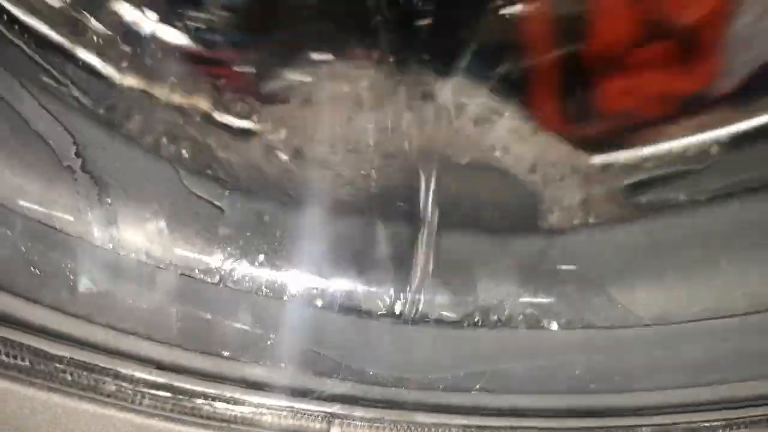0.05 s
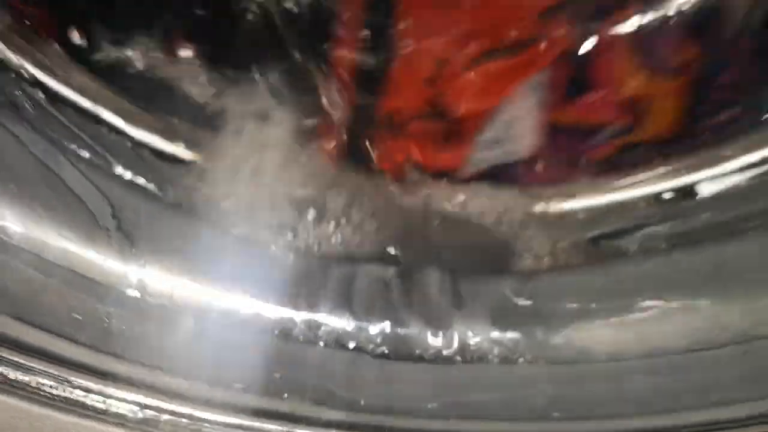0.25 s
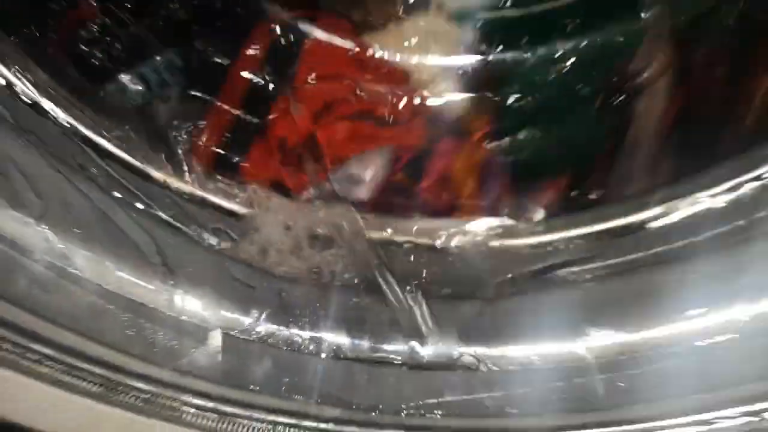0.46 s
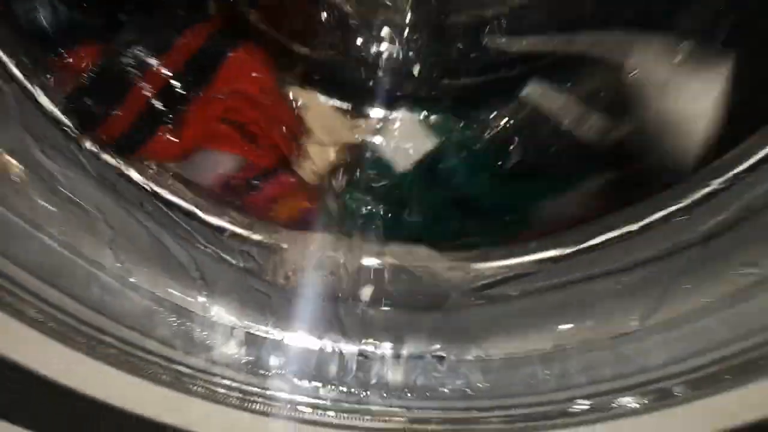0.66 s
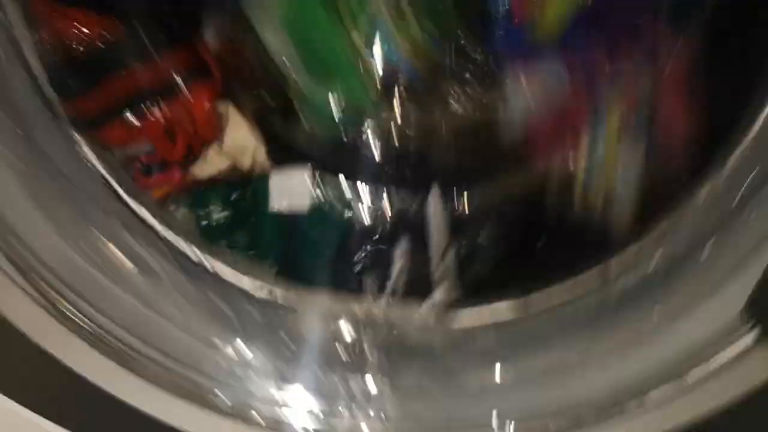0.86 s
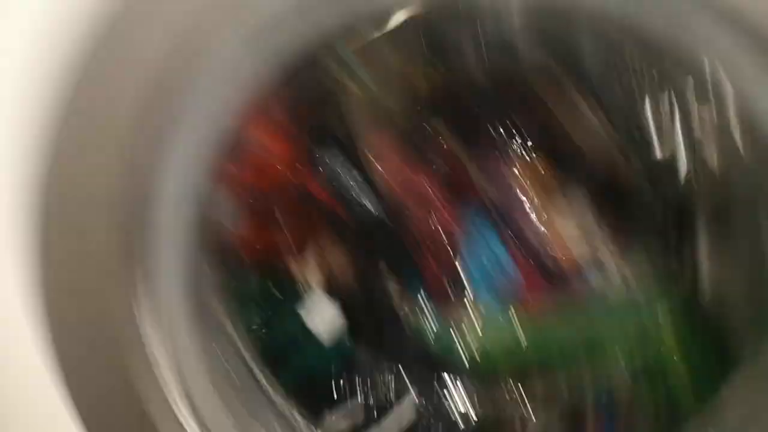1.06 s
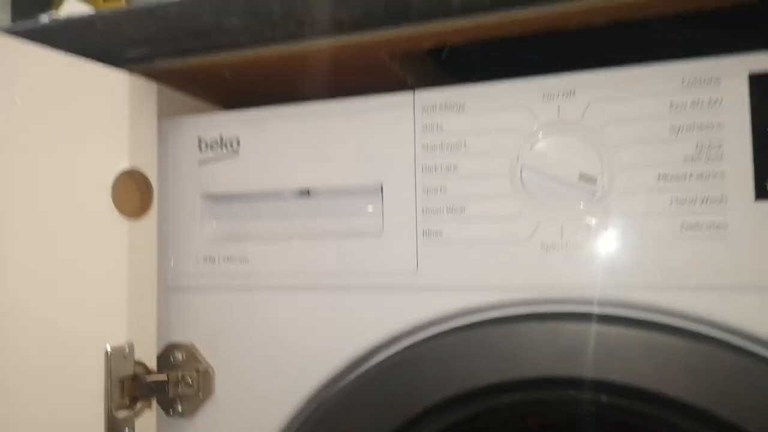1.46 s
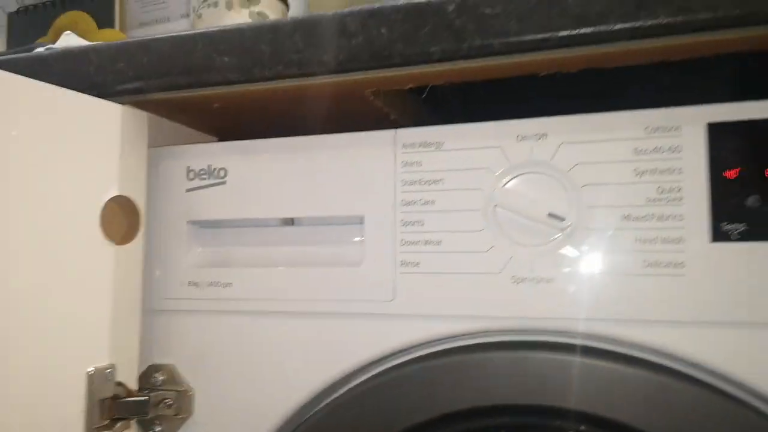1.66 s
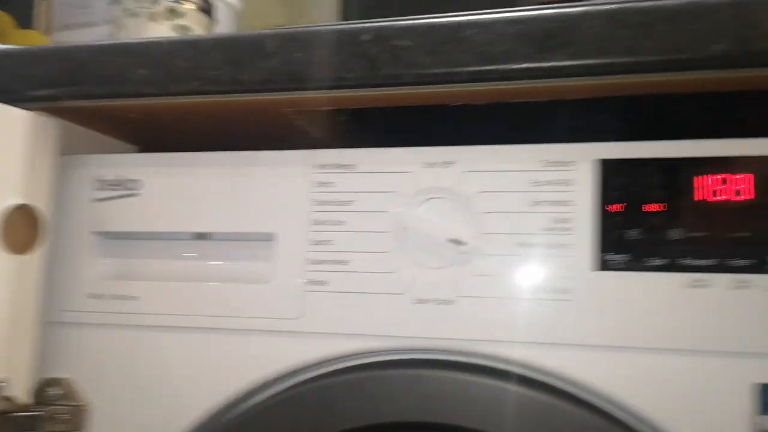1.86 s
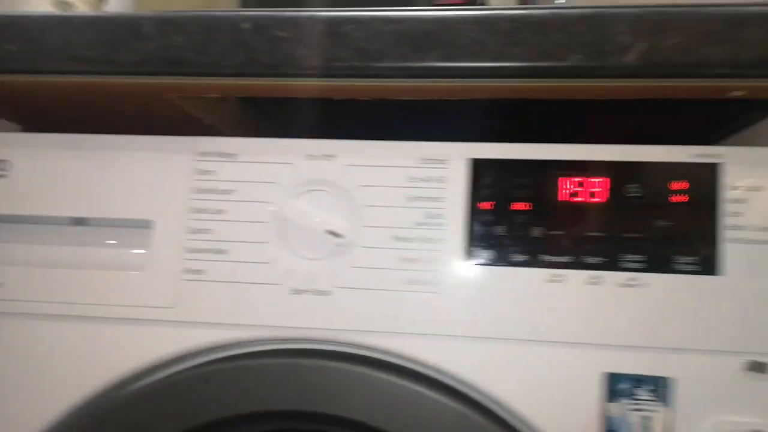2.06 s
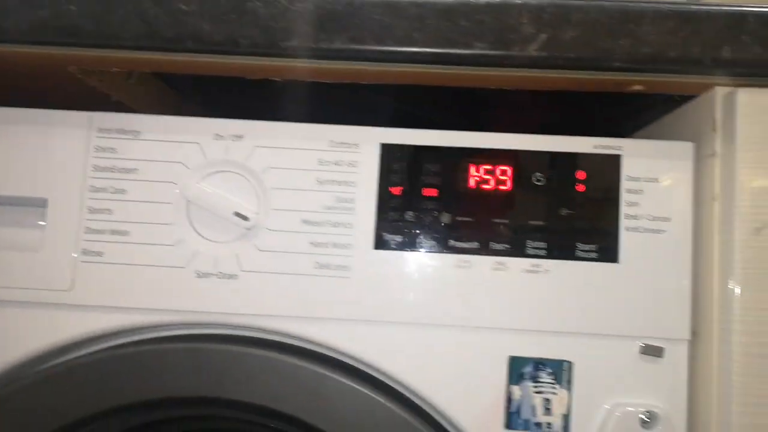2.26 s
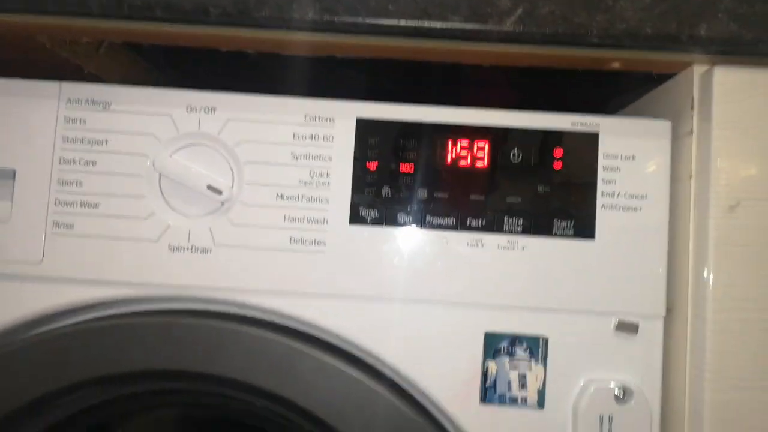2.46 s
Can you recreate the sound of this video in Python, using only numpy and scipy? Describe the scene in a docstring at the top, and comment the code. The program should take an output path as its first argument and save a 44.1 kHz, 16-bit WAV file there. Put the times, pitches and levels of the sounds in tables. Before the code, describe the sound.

Wet laundry sloshing in a faintly humming washing machine, with a brief rubbing rush early on.

```python
"""In a small kitchen, a front-loading washing machine hums and turns wet laundry.
It is heard from a hand-held phone. A short rush, like a sleeve sliding over the phone, shudders
as the cloth sticks and slips. Then water sloshes and drips more and more faintly, with a brief echo,
while the moving phone picks up soft bumps and rumble."""
import sys
import numpy as np
from scipy import signal
from scipy.fft import rfft, irfft
from scipy.io import wavfile

SR = 44100
rng = np.random.default_rng(int(sys.argv[2]) if len(sys.argv) > 2 else 0)


def materialize(psi):
    """Save the field psi as 16-bit PCM at rate SR to the path in sys.argv[1].

    A 1-D psi becomes a single channel; in a 2-D psi each row is a channel.
    """
    bounded = np.clip(np.atleast_2d(psi).T, -1, 1)
    quanta = np.round(bounded * 32767).astype(np.int16)
    wavfile.write(sys.argv[1], SR, quanta)


N = 110250
T = np.arange(N) / SR
F = np.fft.rfftfreq(N, 1 / SR) + 1e-3

# how the rush swells and fades: t/s, relative body level/dB, relative treble level/dB
RUSH_LEVELS = [(.204, -77, -77.5), (.214, -68, -63), (.262, -50.5, -61), (.302, -43, -48), (.41, -38, -46),
               (.585, -38.5, -42), (.612, -34, -38), (.63, -39, -43), (.78, -37, -44), (.803, -45.5, -35),
               (.82, -43.5, -36), (.845, -49, -50), (.9, -55, -74), (.96, -91, -84)]
# low purr of the fast slide: t/s, level/dB
PURR_LEVELS = [(.2, -63), (.24, -48.5), (.39, -40.5), (.43, -36), (.62, -36), (.72, -39), (.81, -38),
               (.87, -57), (.98, -91)]
# tone of the rush's body: f/Hz, level/dB
RUSH_BODY_TONE = [(200, -43), (420, 2), (530, -4.5), (600, -3), (670, -7), (760, -1.5), (900, -6),
                  (1300, -4), (1600, -3.5), (2000, -4), (2650, -4.5), (2950, -4.5), (3250, -15),
                  (5000, -35), (9000, -47)]
# tone of the rush's treble: f/Hz, level/dB
RUSH_TREBLE_TONE = [(1500, -34), (3300, -1.5), (4500, 1), (5800, 1), (7000, 1.5), (9000, -0.5),
                    (10000, -6.5), (11000, -13), (13000, -17), (15500, -23)]
# tone of the purr: f/Hz, level/dB
PURR_TONE = [(30, 3), (70, -6), (100, 0), (140, -0.5), (190, 0), (280, -3.5), (305, -3), (332, 3),
             (360, -4), (420, -6.5), (500, -13.5), (900, -40)]
# spells of sticking and slipping: start/s, length/s, slip rate/Hz, strength/dB
SHUDDERS = [(0.213, 0.099, 71.6, -33.5), (0.293, 0.089, 61, -31.5), (0.388, .3, 110, -44),
            (0.817, 0.088, 88, -32.5), (0.899, 0.059, 105, -41.5), (0.998, 0.045, 55, -38),
            (1.04, 0.21, 49.3, -36.5)]
# water in the drum: t/s, water level/dB, spray level/dB
SLOSH_LEVELS = [(0, -88, -90), (.25, -62.5, -84), (.7, -38, -63), (.87, -55, -55.5), (1.0, -48, -68.5),
                (1.12, -52, -61), (1.27, -53, -62), (1.32, -49, -78), (1.36, -55, -60.5),
                (1.49, -57.5, -64.5), (1.55, -43, -64), (1.65, -51.5, -72), (1.72, -51, -77),
                (1.8, -61, -70), (1.9, -62.5, -76), (2.05, -62.5, -75), (2.24, -63, -67.5),
                (2.5, -66, -80.5)]
# tone of the water: f/Hz, level/dB
WATER_TONE = [(150, -13), (310, -1.5), (510, -6), (700, -8.5), (1020, -7.5), (1300, -11.5), (1560, -5.5),
              (2200, -9.5), (2650, -9), (3150, -15.5), (3700, -16), (4400, -20), (5200, -21.5),
              (6000, -22.5), (7100, -21), (9000, -25.5), (11000, -42), (15500, -42)]
# tone of the spray: f/Hz, level/dB
SPRAY_TONE = [(1500, -42), (3500, -4.5), (4400, -6.5), (5200, 1.5), (6200, -7), (7100, -6.5), (9000, -5),
              (10500, -19), (12000, -74), (15500, -39)]
# scuffs, splashes and a dull knock: t/s, level/dB, f/Hz, width/Hz, swell time/s, left minus right/dB
SCUFFS = [(.222, -45, 2350, 930, .012, -6), (0.226, -52, 1190, 220, 0.015, -4),
          (0.252, -51, 2520, 800, 0.023, -5.5), (0.8, -44, 680, 110, 0.029, 11.5),
          (0.814, -32.5, 2650, 310, 0.02, -6), (.83, -43, 168, 80, 0.051, -1),
          (0.941, -45.5, 2010, 500, 0.0097, -15), (0.94, -55, 6500, 2000, 0.013, -9),
          (1.156, -41, 513, 328, 0.0097, -8.5), (1.159, -45.5, 924, 120, 0.0091, -5),
          (1.41, -48.5, 2800, 1020, 0.0082, -9.5), (1.421, -47, 2010, 400, 0.0064, -14.5),
          (1.793, -61.5, 5150, 3000, 0.0054, -9), (1.894, -65.5, 4700, 3000, 0.0094, -11),
          (1.977, -50.5, 296, 70, .016, 0.5)]
# drips and ticks: t/s, strength/dB, main f/Hz, second f/Hz, second against main/dB,
# time to fade by 60 dB/s, left minus right/dB
TICKS = [(.073, -49, 8860, 1070, -8, .03, 1), (0.129, -68, 4100, 1040, 9.5, 0.084, -4),
         (0.129, -62, 8600, 2250, 1.5, 0.088, -5), (0.772, -32, 4030, 2550, -6, 0.028, -8),
         (0.982, -40, 2620, 1500, -26, 0.014, -7), (1.505, -49.5, 5130, 3800, -5, 0.072, 0),
         (1.543, -46, 5100, 6800, -7, 0.032, -12), (1.56, -59, 6900, 5150, 6, 0.037, -14),
         (1.626, -40, 1560, 2600, -1, .035, -9.5), (1.673, -52, 3610, 1490, 8, 0.027, -12),
         (2.117, -47.5, 3530, 1940, -1, .055, -8.5), (2.247, -52, 4360, 1870, 5.5, 0.042, -2.5),
         (2.288, -50, 6930, 2620, -1.5, 0.037, -14.5)]
# rumble of the moving phone: t/s, sway level/dB, rustle level/dB
RUMBLE_LEVELS = [(0, -42, -80), (.14, -51, -80), (.19, -60, -87), (.25, -34, -65), (.6, -64, -58),
                 (.86, -35, -48.5), (1.0, -32.5, -51), (1.17, -30, -48.5), (1.28, -32, -59.5),
                 (1.43, -30, -47.5), (1.5, -36, -53), (1.66, -42, -51), (1.74, -35.5, -50),
                 (1.79, -38, -56.5), (1.87, -43, -58), (1.93, -43, -65.5), (2.07, -42, -60.5),
                 (2.13, -39.5, -56.5), (2.21, -34, -69), (2.28, -44.5, -72), (2.5, -44.5, -65.5)]
# tones of the sway and the rustle: f/Hz, level/dB
SWAY_TONE = [(6, -3), (14, 5), (26, -0.5), (42, -18), (65, -19), (100, -29), (200, -49), (600, -65)]
RUSTLE_TONE = [(30, -32), (70, 0.5), (130, 3), (220, 2.5), (330, -2.5), (480, -19), (900, -7),
               (3000, -71)]
# soft bumps on the phone: t/s, strength/dB, contact time/s
BUMPS = [(1.148, -13.5, 0.0064), (1.168, -12.5, 0.0043), (1.1763, -30.5, 0.00072), (1.403, -22, 0.002),
         (1.444, -21.5, 0.0032), (1.727, -23, 0.0017), (1.748, -18, 0.0091), (1.786, -32.5, .002),
         (1.813, -31.5, 0.0016), (1.817, -32.5, 0.0017), (1.857, -24, 0.0023), (1.874, -25, 0.003)]
# notes in the motor's hum: f/Hz, level/dB
HUM_NOTES = [(100, -70.5), (144, -68), (184, -76.5), (255, -78), (338, -80.5)]
# tone of the quiet kitchen: f/Hz, level/dB
KITCHEN_TONE = [(25, 12.5), (70, -18), (150, -19), (220, -21), (330, -15), (460, -17), (560, -38),
                (850, -36), (1080, -24), (1400, -46), (2500, -39), (3500, -45), (8000, -46), (11000, -43),
                (15500, -53)]
# pitches that stand out in nearby sounds: f/Hz, width/Hz, boost/dB
RESONANCES = [(1078, 116, 5.5), (1480, 160, 2), (1926, 32, 8.5), (2040, 25, 8), (2420, 270, 4.5),
              (2710, 240, 4), (6790, 140, 6.5), (7520, 110, 5.5)]
# lean to one side: f/Hz, left minus right/dB
BALANCE = [(450, 0), (850, 1), (1300, -6.5), (1800, -8), (2500, -13.5), (3300, -2), (5000, -5), (6700, -5),
           (8500, -1), (12000, -1.5)]
# stereo width between the phone's two microphones: f/Hz, side minus middle/dB
STEREO_WIDTH = [(30, -22), (85, -22), (170, -10), (350, -11.5), (480, 9.5), (650, -1), (1050, -2),
                (1400, -0.5), (1800, 5), (2400, 2), (4000, 0)]


def rush():
    """Sliding fibres make countless tiny slips: a ringing body, a gritty treble and a low purr."""
    slips = grains(per_s=2700, spread_db=0.59, ring_s=0.0053)
    flicker = undb(0.46 * wander(hz=37))
    body = shape(slips, RUSH_BODY_TONE) * fade(RUSH_LEVELS, column=1) * flicker
    treble = shape(slips, RUSH_TREBLE_TONE) * fade(RUSH_LEVELS, column=2)
    purr = shape(grains(per_s=2000, spread_db=0.55, ring_s=0.0045), PURR_TONE) * fade(PURR_LEVELS)
    return undb(1.0) * (body + treble) + purr


def shudders(jitter=.08, slip_s=0.0021, dull_hz=180):
    """The rubbing cloth sticks and slips, giving uneven low pulses."""
    out = np.zeros(N)
    for start, length, rate, db in SHUDDERS:
        gaps, sizes = rng.standard_normal((2, 40))
        times = start + (np.cumsum(1 + jitter * gaps) - .5) / rate
        pulses = np.zeros(N)
        for at, size in zip(times, sizes):
            if at < start + length:
                pulses += undb(1.8 * size) * push(at, slip_s)
        low_cut = signal.butter(2, 0.6 * rate, "high", fs=SR, output="sos")
        pulses = signal.sosfilt(low_cut, pulses)
        out += unit(pulses) * np.sqrt(length * SR / N) * undb(db)
    return irfft(rfft(out) / (1 + (F / dull_hz) ** 4), N)


def slosh():
    """Wet laundry turns behind the glass: splashes, bubbles and fine spray."""
    water = grains(per_s=900, spread_db=0.83, ring_s=0.0076) + undb(-6.5) * bubbles()
    spray = shape(grains(per_s=550, spread_db=4.9, ring_s=0.0076), SPRAY_TONE)
    flicker = undb(1.4 * wander(hz=25))
    water = shape(water, WATER_TONE) * fade(SLOSH_LEVELS, column=1) * flicker
    return water + spray * fade(SLOSH_LEVELS, column=2)


def bubbles(count=800):
    """Small bubbles ring briefly and rise in pitch."""
    out, t = np.zeros((2, N + 2048)), T[:2048]
    for when, pitch, size, side in rng.random((count, 4)):
        hz, start = 1300 * 6 ** pitch, int(when * N)
        age = t * hz / 14  # reaches 1 after 14 cycles
        rise = 1 + 0.0358 * np.minimum(age, 4)
        ring = np.exp(-age) * np.sin(2 * np.pi * hz * t * rise)
        out[:, start:start + len(t)] += pan(16 * (side - .5)) * undb(8.9 * size) * ring
    return unit(out[:, :N])


def scuffs():
    """Scuffs, splashes and a knock are brief swells of crackle, each around its own pitch."""
    crackle = irfft(stereo(grains(per_s=2500, spread_db=1.2, ring_s=0.00081)), N)
    out = 0
    for at, db, hz, width, swell_s, side in SCUFFS:
        swell = np.exp(-((T - at) / swell_s) ** 2)
        out += band(crackle, hz, width) * undb(db) * pan(side) * swell
    return out


def ticks(relative_width=.115, attack_s=0.0009):
    """Drops and small hard things tap the machine: a crack and two short rings."""
    out, hiss = 0, noise()
    crack = undb(-11.5) * band(hiss, hz=4000, width=4000)
    for at, db, hz, second_hz, second_db, fade_s, side in TICKS:
        age = np.maximum(T - at, 0)
        ring = band(hiss, hz, relative_width * hz)
        ring += undb(second_db) * band(hiss, second_hz, 2 * relative_width * second_hz)
        loudness = (1 - np.exp(-age / attack_s)) * undb(-60 * age / fade_s)
        out += undb(db) * pan(side) * (ring + crack) * loudness
    return out


def handling(rebound=0.53, lag_s=0.0091):
    """The phone sways, rustles in the hand and takes soft bumps, each between two dips of pressure."""
    sway = shape(noise(), SWAY_TONE) * fade(RUMBLE_LEVELS, column=1)
    rustle = shape(noise(), RUSTLE_TONE) * fade(RUMBLE_LEVELS, column=2)
    bumps = 0
    for at, db, contact_s in BUMPS:
        dips = 0.67 * push(at - lag_s, 2 * contact_s) + 0.25 * push(at + lag_s, 2 * contact_s)
        bumps += undb(db) * (push(at, contact_s) - rebound * dips)
    return sway + rustle + bumps


def motor():
    """The drum motor hums, wavering a little in pitch and loudness."""
    uneven_time = np.cumsum(1 + 0.0095 * wander(hz=7)) / SR
    hum = 0
    for hz, db in HUM_NOTES:
        height = np.sqrt(2) * undb(db + 2.8 * wander(hz=5.3))
        hum += height * np.sin(2 * np.pi * hz * uneven_time)
    return hum


def kitchen_echo(sound, delay_s=.006, fade_s=0.42, dull_hz=3940):
    """The kitchen throws back a short, duller echo."""
    tail = unit(noise() * (T > delay_s) * undb(-60 * T / fade_s)) / np.sqrt(N)
    tail = irfft(rfft(tail) / (1 + 1j * F / dull_hz), N)
    return signal.fftconvolve(sound, tail, axes=1)[:, :N]


def kitchen_quiet():
    """A faint, steady, low noise fills the room."""
    return undb(-60.5) * shape(noise(), KITCHEN_TONE)


def undb(db):
    """Turn decibels into a multiplier."""
    return 10 ** (np.asarray(db) / 20)


def unit(x):
    """Scale a signal to an average power of 1."""
    return x / np.sqrt(np.mean(x ** 2) + 1e-20)


def fade(rows, column=1):
    """A multiplier over time, from one dB column of a table."""
    rows = np.array(rows)
    return undb(np.interp(T, rows[:, 0], rows[:, column]))


def spectrum(rows):
    """Join a table's points to get dB at every frequency."""
    rows = np.array(rows)
    return np.interp(np.log(F), np.log(rows[:, 0]), rows[:, 1])


def pan(db):
    """Left and right multipliers; positive dB leans left."""
    return undb(np.array([[.5], [-.5]]) * db)


def noise():
    """Two unrelated white noises."""
    return rng.standard_normal((2, N))


def wander(hz):
    """A smooth random drift of about 1 either way, mostly slower than hz."""
    return unit(irfft(rfft(rng.standard_normal(N)) / (1 + (F / hz) ** 4), N))


def grains(per_s, spread_db, ring_s):
    """Tiny contacts of uneven size at random moments, each a very short burst of noise."""
    hits = rng.random(N) < per_s / SR
    sizes = undb(spread_db * np.minimum(rng.exponential(size=N), 4))
    power = signal.lfilter([1], [1, -np.exp(-2 / (ring_s * SR))], hits * sizes ** 2)
    return unit(np.sqrt(power) * noise())


def push(at, contact_s):
    """One pulse of pressure with a rounded tip."""
    return np.exp(-np.sqrt(((T - at) / contact_s) ** 2 + 0.034))


def band(x, hz, width):
    """Keep the sound near one pitch by passing it twice through a resonance."""
    return unit(irfft(rfft(x) / (1 + 1j * (F / hz - hz / F) * hz / width) ** 2, N))


def stereo(x):
    """Mix two unrelated signals into left and right spectra that share their bass."""
    middle, side = rfft(x)
    width = undb(spectrum(STEREO_WIDTH))
    return (middle + np.array([[1], [-1]]) * side * width) / np.sqrt(1 + width ** 2)


def shape(x, tone):
    """Give two unrelated signals a tone, add the nearby resonances and spread them left and right."""
    boost_db = sum(db / (1 + (2 * (F - hz) / width) ** 2) for hz, width, db in RESONANCES)
    lean_db = spectrum(BALANCE) / (1 + (300 / F) ** 4)  # the bass stays in the middle
    return unit(irfft(stereo(x) * undb(spectrum(tone) + boost_db) * pan(lean_db), N))


def scene():
    """Water, scuffs and ticks echo in the kitchen; the rubbing is right at the microphone."""
    machine = slosh() + scuffs() + ticks()
    echo = undb(-7.5) * kitchen_echo(machine)
    background = motor() + kitchen_quiet()
    return machine + echo + background + rush() + shudders() + handling()


def record(dry):
    """The phone cuts the highest treble, above 15400 Hz."""
    return signal.sosfilt(signal.ellip(10, .2, 70, 15400, fs=SR, output="sos"), dry)


dry = scene()
out = record(dry)
materialize(out)
```